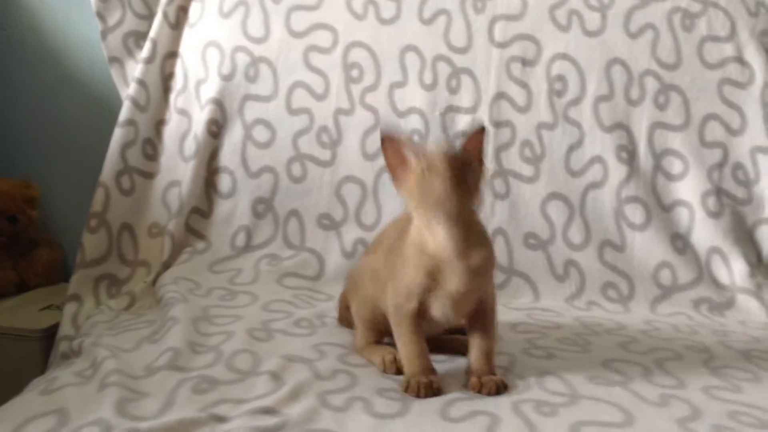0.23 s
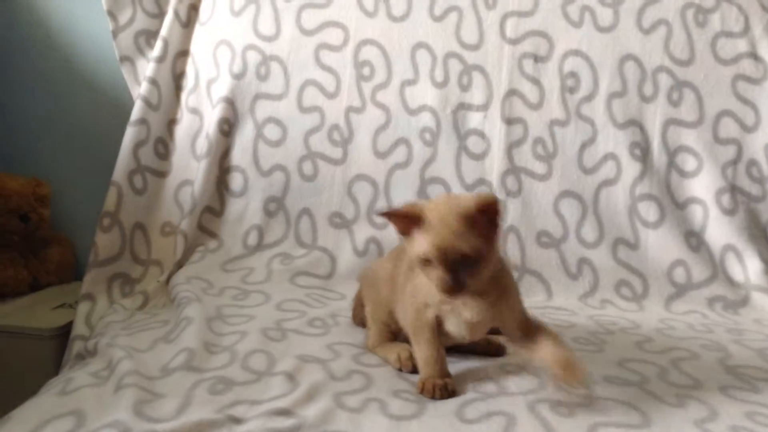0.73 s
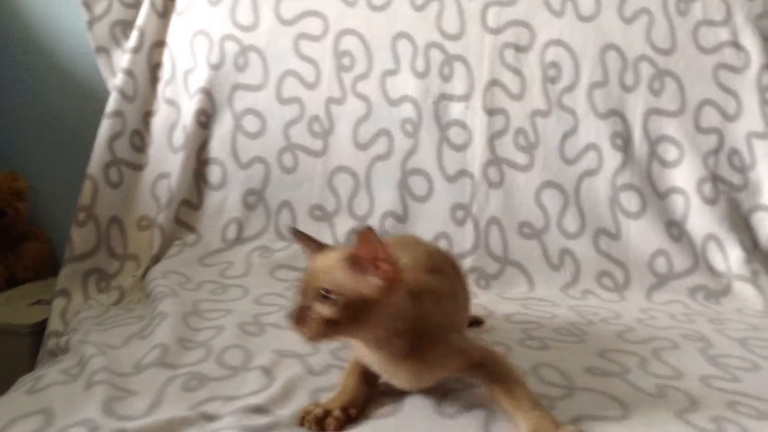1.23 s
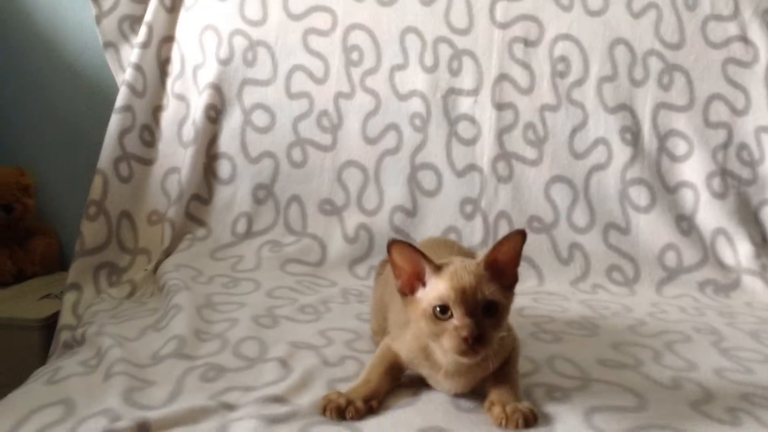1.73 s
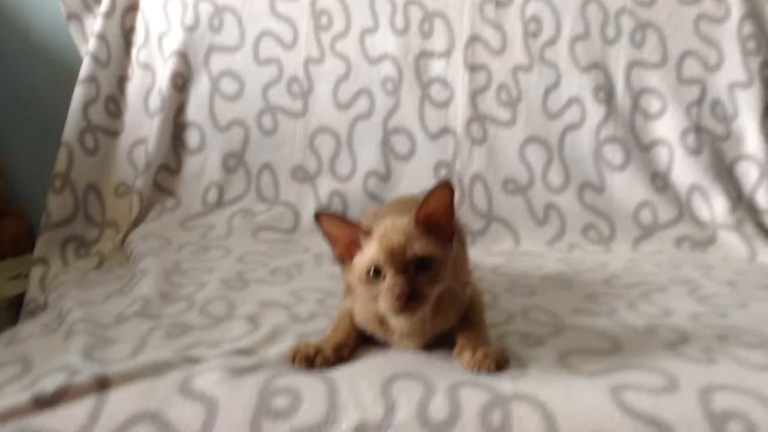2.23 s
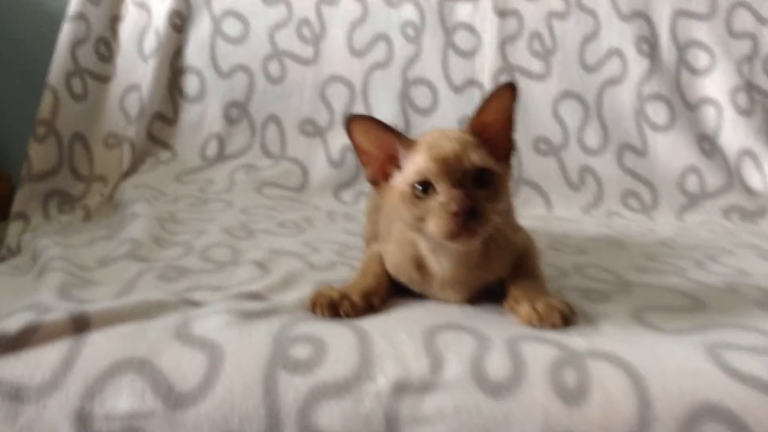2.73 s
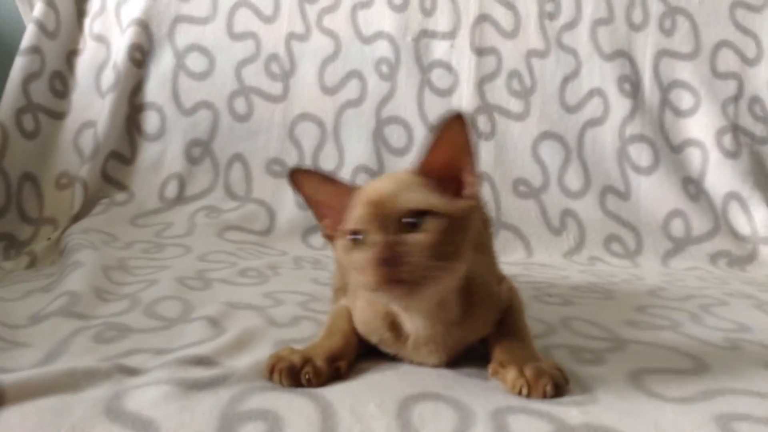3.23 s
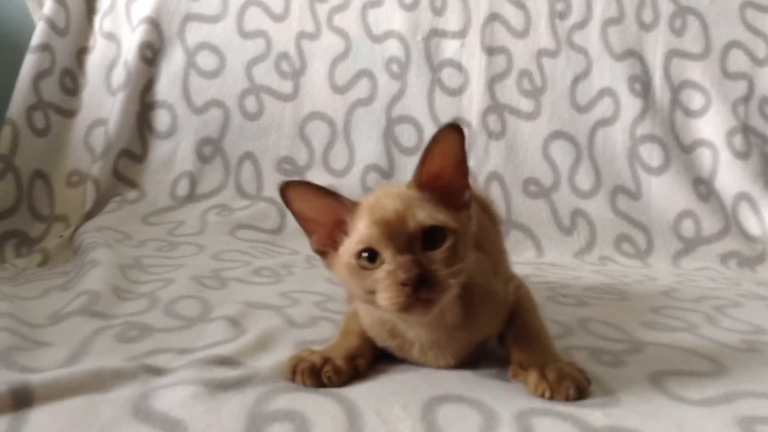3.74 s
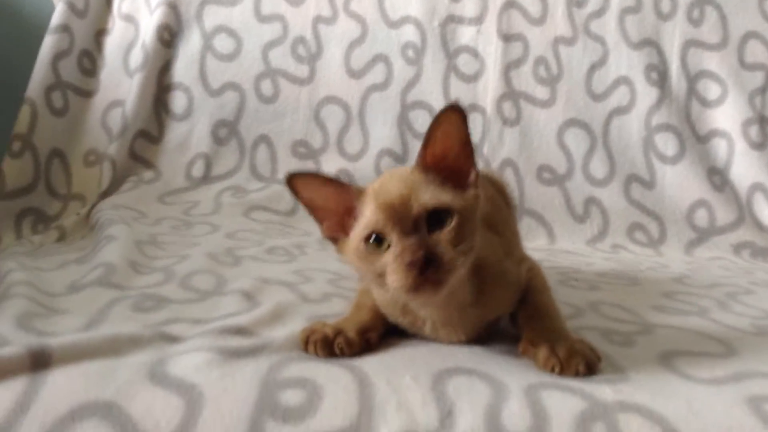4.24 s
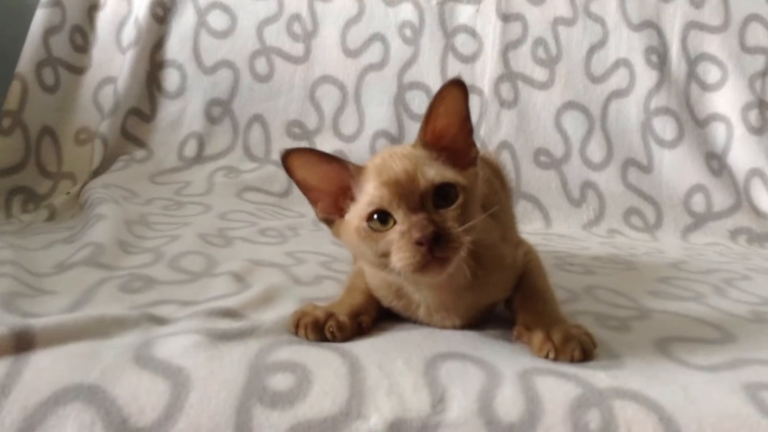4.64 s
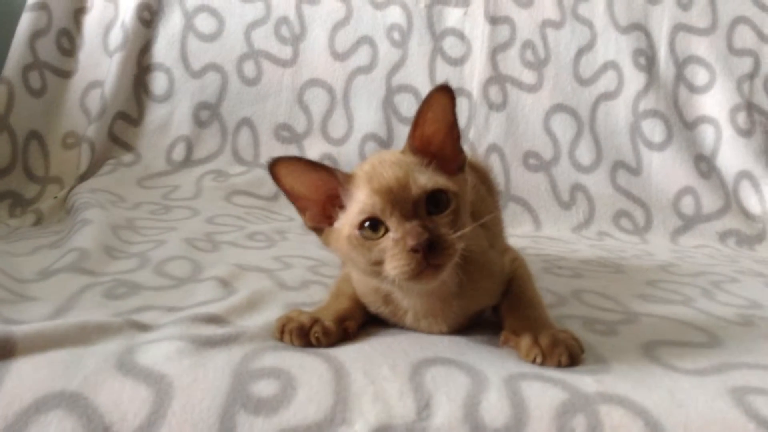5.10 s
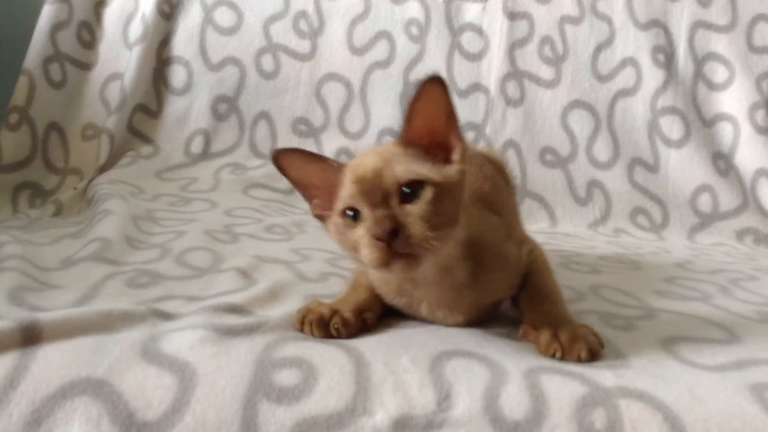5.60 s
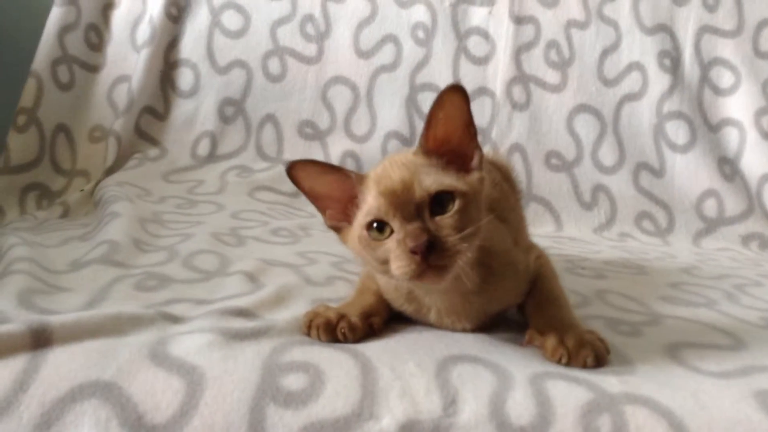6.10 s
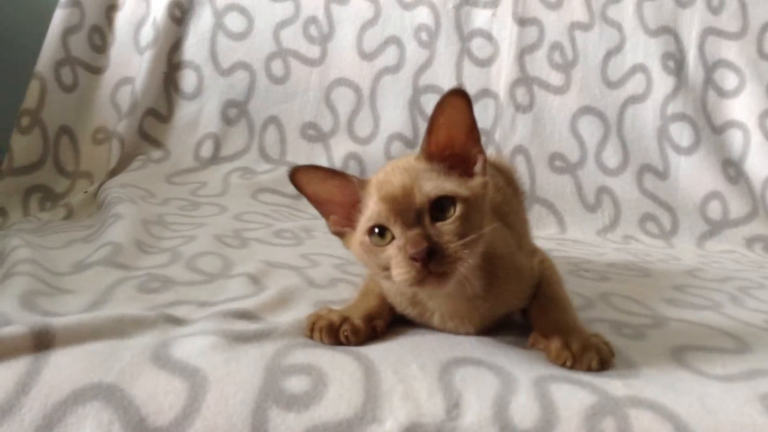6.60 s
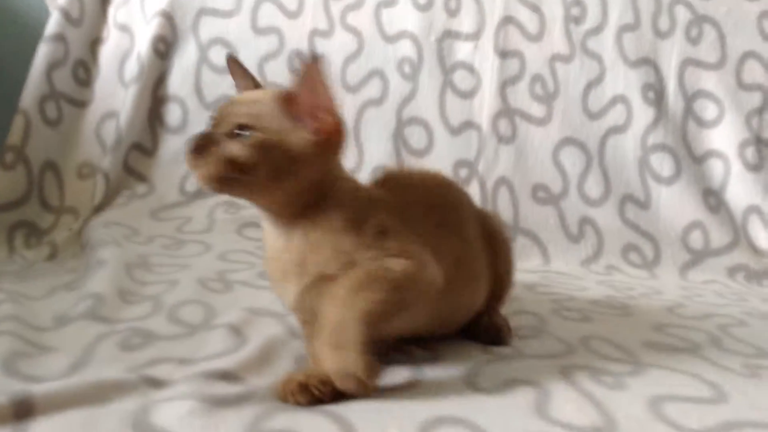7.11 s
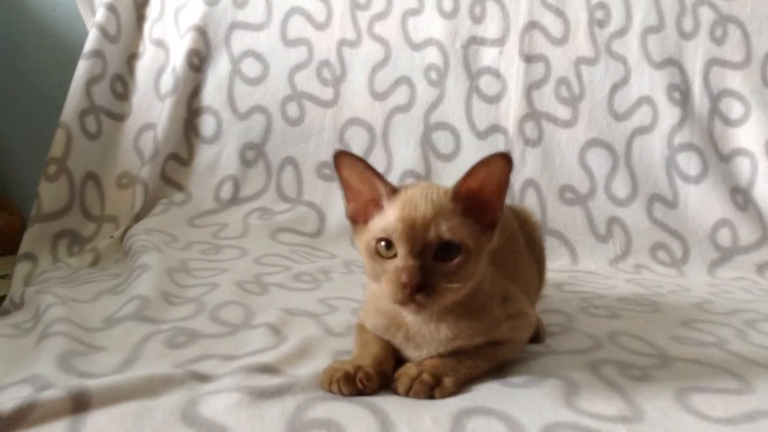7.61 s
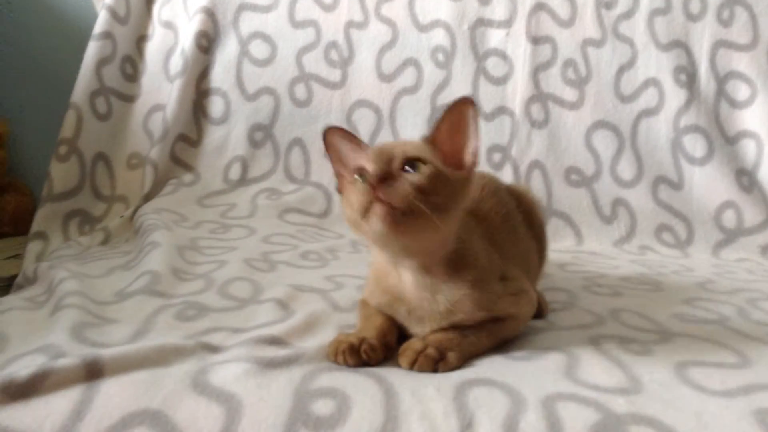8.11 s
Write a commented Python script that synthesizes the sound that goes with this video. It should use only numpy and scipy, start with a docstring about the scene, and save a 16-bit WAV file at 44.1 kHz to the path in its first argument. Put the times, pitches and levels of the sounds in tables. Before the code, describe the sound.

Dry, intimate fabric sounds: fur brushing cloth, paws scuffing the weave, claws catching in tiny sharp snaps, and dull cushion thumps. The strongest brushing swish comes under a second in; the densest scratching and thumping follows around the middle, then a few muffled knocks, then quiet rustling. Behind it all, soft hiss and a distant low engine hum gradually gaining speed, heard on a small, bass-thin microphone.

```python
"""A kitten plays on a cloth-covered sofa in a quiet room, close to the microphone.
From the start fur and paws brush the cloth: shaped slip noise, one envelope per stroke.
A far engine drones through the walls, slowly gaining speed: harmonics over rumble, above steady hiss.
Soft thumps ring the cushion in damped modes; claws and threads tick as short resonant snaps."""
import sys
import numpy as np
from scipy import signal
from scipy.fft import rfft, irfft, next_fast_len
from scipy.io import wavfile
from scipy.ndimage import uniform_filter1d, map_coordinates

SR = 44100
rng = np.random.default_rng(int(sys.argv[2]) if len(sys.argv) > 2 else 0)


def inscribe(sig):
    """Save sig as 16-bit PCM at rate SR to the path in sys.argv[1].

    A 1-D sig is mono; a 2-D sig holds one channel per row.
    Samples are clipped to [-1, 1] before scaling.
    """
    pcm = np.round(np.clip(np.atleast_2d(sig).T, -1, 1) * 32767)
    wavfile.write(sys.argv[1], SR, pcm.astype(np.int16))


N = 368219


def amp(db):
    """Gain of a level in dB."""
    return 10 ** (np.asarray(db) / 20)


def unit(x):
    """x at rms 1."""
    return x / np.sqrt(np.mean(x ** 2) + 1e-20)


def along(points, hz):
    """Interpolate (hz, value) points on a log frequency axis."""
    f, v = np.transpose(points)
    return np.interp(np.log(hz + 1), np.log(f + 1), v)


def curves(rows):
    """One per-sample curve for each column after the time."""
    s, *cols = np.transpose(sorted(map(tuple, rows)))
    return [np.interp(np.arange(N) / SR, s, c) for c in cols]


def wobble(knots_per_s):
    """A smooth random curve through normal knots."""
    knots = rng.standard_normal(int(N * knots_per_s / SR) + 4)
    return map_coordinates(knots, [np.arange(N) * knots_per_s / SR])


def filtered(x, response):
    """x times a response of frequency."""
    m = next_fast_len(len(x) + 8192)
    return irfft(rfft(x, m) * response(np.fft.rfftfreq(m, 1 / SR)), m)[:len(x)]


def peak(f, hz, width_hz):
    """A causal resonance of top gain 1."""
    return 1j * f * width_hz / (hz * hz - f * f + 1j * f * width_hz)


def fibres(spike_db, clump_db, patchy_db, snaps_per_s, snap_db):
    """Many fibres slipping: noise with uneven slip sizes, in clumps, some hard snaps, patches of colour."""
    slips = rng.standard_normal(N) * amp(spike_db * wobble(900) + clump_db * wobble(180))
    snap_here = rng.random(N) < snaps_per_s / SR
    slips += snap_here * amp(snap_db) * np.clip(rng.standard_normal(N), -1.6, 1.6)
    z = signal.stft(slips, nperseg=256)[2]
    field = uniform_filter1d(rng.standard_normal(z.shape), size=4, axis=0)  # across frequency
    field = uniform_filter1d(field, size=10, axis=1)  # across time
    return signal.istft(z * amp(patchy_db * unit(field)), nperseg=256)[1][:N]


def stroke_power():
    """Powers of brushing, scuffing, pressing: strokes land, swell and fall over stirring that rises and sinks."""
    # fur shifting between strokes: time_s, brushing_db
    stir = [(0, -53.5), (.42, -56.5), (.5, -61), (.97, -59.5), (1.45, -62), (1.87, -59.5), (2.5, -60.5),
            (2.6, -70), (3.05, -75), (3.3, -56), (3.7, -66), (4.7, -58.5), (5.0, -73.5), (5.3, -65.5),
            (5.75, -69), (6.4, -71.5), (6.65, -75), (6.75, -62), (7.3, -66), (7.78, -74), (8.0, -59.5),
            (8.35, -59.5)]
    # strokes on the cloth: start_s, swell_s, fall_s (time scale; 0 or less: at once),
    # brushing_db, scuffing_db, pressing_db (nominal peaks)
    strokes = [(0.0, 0.0027, 0.06, -71, -77, -53), (.15, 0.06, 0.07, -50, -60, -66),
               (.25, 0.028, -2.5, -54, -76, -80), (.08, .01, .08, -51.5, -61, -69),
               (0.308, 0.0025, 0.15, -64, -55.5, -58), (.347, 0.0027, 0.24, -59, -58.5, -65),
               (.34, 0.056, 0.03, -49.5, -64, -80), (0.572, 0.0036, 0.13, -48, -64, -65),
               (.616, 0.019, .3, -50, -60.5, -74), (.69, 0.064, -1, -51, -64, -69),
               (0.77, 0.0034, 0.04, -31, -41.5, -56), (0.777, 0.011, 0.09, -31.5, -44, -47.5),
               (1.003, 0.058, 0.08, -37.5, -49, -52.5), (1.089, 0.036, 0.36, -39, -51.5, -61),
               (1.155, .003, 0.11, -44, -58, -68), (1.31, 0.019, 0.37, -51.5, -61.5, -83.5),
               (1.395, 0.0033, 0.02, -46.5, -70, -81), (1.47, .023, 0.34, -78, -59, -64),
               (1.95, 0.055, 0.28, -50, -59.5, -65.5), (2.04, 0.044, 0.33, -54, -64, -65),
               (2.088, 0.021, .1, -42, -59, -61.5), (2.158, 0.043, 0.18, -49, -55.5, -57.5),
               (2.19, .004, 0, -62, -55, -51), (2.251, .003, 0.17, -61, -75, -53.5),
               (2.323, 0.0043, 0.06, -58, -62, -55), (2.345, 0.0072, 0.35, -54.5, -59, -60),
               (2.556, 0.0016, 0.1, -58, -56.5, -55.5), (2.654, 0.0018, 0.27, -68, -64.5, -66.5),
               (2.79, 0.052, 0, -62.5, -70, -80), (2.956, .002, 0.06, -60, -56.5, -62.5),
               (3.087, 0.0024, -0.1, -59, -78, -52), (3.126, 0.06, 0.1, -60, -54, -53),
               (3.19, 0.061, 0.1, -52, -66, -85), (3.306, 0.036, 0.14, -37.5, -47, -53),
               (3.41, 0.079, 0.17, -44, -57, -62), (3.544, 0.03, 0.25, -42.5, -48.5, -52.5),
               (3.58, 0.071, 0.07, -55, -46.5, -50), (3.705, .01, 0.05, -68, -70, -52),
               (3.725, 0.01, .04, -60, -50, -50.5), (3.81, .003, 0.16, -58, -56.5, -58),
               (3.836, .003, 0.06, -53, -59, -51.5), (3.865, 0.066, 0.1, -49.5, -46, -49),
               (4.09, 0.011, 0.09, -48, -48.5, -48), (4.034, 0.036, 0.0652, -40.5, -37, -41),
               (4.14, 0.027, 0.38, -47, -56, -59), (4.184, 0.035, 0, -43, -46, -48),
               (4.224, 0.014, 0.07, -47, -52, -40), (4.276, 0.0022, .07, -48, -49, -61),
               (4.37, .03, 0.4, -56, -68, -66), (4.415, 0.025, 0.07, -44, -40.5, -51),
               (4.487, 0.0016, 0.0953, -44, -44, -46.5), (4.523, 0.034, .06, -42.5, -38, -42.5),
               (4.671, 0.0017, 0.07, -70, -78, -47), (4.779, 0.0025, 0.0461, -49, -39.5, -45.5),
               (4.785, 0.042, 0.0871, -37.5, -35.5, -50), (4.819, 0.019, 0.13, -54, -53, -46),
               (4.93, 0.006, 0.4, -66, -74, -63), (5.27, 0.07, 0.6, -55.5, -62.5, -75),
               (5.39, 0.052, 0.15, -44.5, -57.5, -66), (5.66, 0.022, .15, -61, -70, -75),
               (5.776, 0.0019, 0.1, -75, -63, -49.5), (5.88, 0.0018, 0.1, -57, -53, -62),
               (5.915, 0.0088, 0.23, -66.5, -73, -64.5), (6.039, 0.0018, 0.08, -49.5, -62, -44),
               (6.06, 0.012, 0.32, -59, -65, -71), (6.094, 0.00087, .015, -39, -66, -74),
               (6.19, 0.023, .03, -64, -73, -51.5), (6.231, .002, 0.04, -52, -53.5, -43.5),
               (6.13, 0.0058, 0.16, -59, -69, -59), (6.68, .03, 0.5, -63.5, -72, -89),
               (6.79, 0.037, 0.32, -49.5, -62.5, -71), (6.93, 0.035, 0.21, -46.5, -57.5, -65.5),
               (7.1, 0.058, 0.2, -55.5, -65.5, -83), (7.37, 0.05, 0.7, -66, -72, -78),
               (7.5, 0.008, 0.24, -60.5, -79, -84), (7.93, 0.037, 0.6, -62, -65.5, -79),
               (8.1, 0.093, -0.05, -51, -63.5, -74), (8.264, 0.0023, 0.7, -53.5, -75, -85),
               (8.3, 0.04, .05, -61, -59.5, -69.5)]
    # rate of fall: brushing, scuffing, pressing [x 20 dB at fall_s]
    fall_speeds = [1.26, 1.146, 1.3]
    touch_db, swell_db_per_s = 7, 64  # start under the peak; a longer swell starts lower
    build_s, build_share = 0.0018, 0.092  # landing time constant, plus this share of the swell
    hold_share, fall_bend = 0.19, 0.84  # hold as a share of the swell; bend under 1: the fall slows down
    stir_scuff_db, stir_press_db = -10.5, -18.5  # under the brushing

    stir_db, = curves(stir)
    power = amp(2 * (stir_db + np.c_[[0, stir_scuff_db, stir_press_db]]))
    for start_s, swell_s, fall_s, *peaks_db in strokes:
        first = round(max(start_s, 0) * SR)
        swell_s, fall_s = max(swell_s, 1 / SR), max(fall_s, 1 / SR)
        t = np.arange(min(N - first, SR)) / SR
        rising_db = (touch_db + swell_db_per_s * swell_s) * np.clip(1 - t / swell_s, 0, 1)
        since_hold_s = np.maximum(t - swell_s * (1 + hold_share), 0)
        falling_db = 20 * np.c_[fall_speeds] * (since_hold_s / fall_s) ** fall_bend
        landing = 1 - np.exp(-t / (build_s + build_share * swell_s))
        power[:, first:first + len(t)] += amp(2 * (np.c_[peaks_db] - rising_db - falling_db)) * landing ** 2
    return power


def cloth():
    """Fur hisses finely; coarse slips under a paw sound through the weave, its taut threads and the padding."""
    # fur on cloth: freq_hz, gain_db
    brush_curve = [(300, -46), (1000, -40), (2500, -19), (5000, -2.5), (8000, -1), (12000, -0.5),
                   (16000, -1)]
    # weave under a paw: freq_hz, gain_db
    scuff_curve = [(500, -32), (1200, -5.5), (2200, 0), (4000, 0), (7000, -4), (15000, -23)]
    # padding under the cloth: freq_hz, gain_db
    pad_curve = [(70, -57), (150, 8), (300, 7.5), (600, 3), (1100, 0), (1800, -9), (4000, -33)]
    # hollows under the padding: freq_hz, width_hz, lift_db
    hollows = [(790, 900, 5.5), (1090, 220, 1.5)]
    # taut threads that sing under a scuff: start_s, end_s, freq_hz, width_hz, gain_db (on the band added)
    rings = [(0.3, 0.362, 2780, 500, 3), (2.345, 2.395, 2170, 400, 8), (3.14, 3.24, 3400, 700, 6),
             (3.53, 3.66, 3270, 500, 2.5), (3.9, 3.987, 3820, 500, -7), (4.047, 4.102, 1170, 200, 10),
             (4.398, 4.444, 2470, 150, 6.5), (4.52, 4.58, 2440, 150, 2), (4.79, 4.863, 2500, 127, 5),
             (4.8, 4.86, 4060, 300, -1.5), (5.768, 5.822, 2430, 696, 12), (6.244, 6.308, 1540, 395, 26)]

    def hollow(f):
        return 1 + sum((amp(db) - 1) * np.abs(peak(f, hz, w)) ** 2 for hz, w, db in hollows)

    fine = fibres(spike_db=1.5, clump_db=1.3, patchy_db=1.5, snaps_per_s=200., snap_db=18.0)
    coarse = fibres(spike_db=1.0, clump_db=1.5, patchy_db=2.0, snaps_per_s=320., snap_db=14.5)
    brush = unit(filtered(fine + 0.065 * coarse, lambda f: amp(along(brush_curve, f))))
    scuff = unit(filtered(coarse, lambda f: amp(along(scuff_curve, f))))
    press = unit(filtered(coarse, lambda f: amp(along(pad_curve, f)) * hollow(f)))
    for start_s, end_s, hz, width_hz, db in rings:
        span = slice(round(start_s * SR), round(end_s * SR))
        sung = filtered(scuff[span], lambda f: peak(f, hz, width_hz))
        scuff[span] += amp(db) * signal.windows.tukey(len(sung), .4) * sung
    return np.sum(np.sqrt(stroke_power()) * [brush, scuff, press], axis=0)


def engine():
    """Unsteady harmonics of the firing rate, lifted near wall modes, over a broad rumble with one room mode."""
    # far engine: time_s, firing_hz, third_harmonic_db, others_db (used relative to its maximum)
    course = [(0, 54.77, -84, -50), (.7, 55.13, -76, -67), (1.4, 56.2, -63.5, -66),
              (2.55, 57.3, -63, -57.5), (2.75, 57.5, -56.5, -69), (3.3, 59.8, -59, -58),
              (4, 61.2, -56.5, -61), (4.6, 62, -61, -64), (5.2, 63.44, -67.5, -86), (5.8, 62.8, -61, -73),
              (6.5, 63.55, -69, -79.5), (7.2, 64.4, -72.5, -94), (7.6, 64, -59.5, -85),
              (8.35, 65.2, -61.5, -88)]
    # other harmonics: multiple of the firing rate
    harmonics = [2, 4, 5, 6]
    # each other harmonic, then the rumble: level_db (at the others' maximum), share of the fading followed
    fades = [(-70, 0.2), (-60.5, 0.77), (-70, 1.07), (-76, 0.47), (-60.5, 0.16)]
    # wall modes that lift a passing harmonic: freq_hz, width_hz, lift_db
    wall_modes = [(112.4, 6.2, 6), (341.7, 7.8, 12.5)]
    # rumble: freq_hz, gain_db
    rumble_curve = [(30, -30), (60, 2.5), (85, -18), (130, -5), (200, 2.5), (300, -4), (450, -11.5),
                    (800, -17), (1400, -58)]
    flutter_db, phase_wobble_rad = 2.2, 0.65

    def lift_db(f):
        return sum(db * np.abs(peak(f, mode_hz, w)) ** 2 for mode_hz, w, db in wall_modes)

    def room(f):
        return amp(along(rumble_curve, f)) * (1 + 0.94 * np.abs(peak(f, 171.0, 45)) ** 2)

    hz, third_db, others_db = curves(course)
    fading_db = others_db - others_db.max()
    *tones_db, rumble_db = [db + share * fading_db for db, share in fades]
    turn = 2 * np.pi * np.cumsum(hz) / SR
    tones = 0
    for k, db in zip([3] + harmonics, [third_db] + tones_db):
        level = amp(db + lift_db(k * hz) + flutter_db * wobble(12))
        tones = tones + level * np.sin(k * turn + phase_wobble_rad * wobble(10.))
    rumble = unit(filtered(rng.standard_normal(N), room))
    return np.sqrt(2) * tones + amp(rumble_db + 2.5 * wobble(5.3)) * rumble  # tone levels are rms


def hiss():
    """The steady noise floor of room and microphone."""
    # room and microphone: freq_hz, gain_db
    floor_curve = [(200, 7), (400, -21), (800, -10), (2000, -10.5), (6000, -12), (15000, -15)]
    level_db = -67.5
    return amp(level_db) * unit(filtered(rng.standard_normal(N), lambda f: amp(along(floor_curve, f))))


def thumps():
    """A blow is one quick push; the cushion then rings with a few damped modes and a dull puff."""
    # soft blows on the cushion: start_s, level_db, pitch_hz, t60_s
    blows = [(0.006, -46, 328, 0.1), (0.787, -55, 528, 0.063), (1.015, -51, 239.5, 0.3),
             (2.252, -42.5, 208, 0.12), (2.33, -42, 146.4, 0.15), (4.046, -45.5, 284, 0.18),
             (4.184, -32.5, 277, 0.039), (4.241, -27.5, 285.6, 0.11), (4.558, -39, 271, 0.12),
             (4.676, -41, 243, 0.051), (5.776, -50.5, 158, 0.17), (6.04, -41, 350, 0.04),
             (6.061, -41.5, 139, 0.12), (6.205, -39, 168, 0.031), (6.289, -34, 238, 0.083),
             (6.31, -34, 158, 0.16), (6.385, -46.5, 217, 0.14), (6.96, -49, 268, 0.07)]
    # cushion modes: multiple of pitch_hz, level_db
    modes = [(.56, -4.5), (1, 2), (1.25, -10), (2.02, -13.5)]
    out, t = np.zeros(N + SR), np.arange(SR // 3) / SR
    for start_s, db, hz, t60_s in blows:
        push = 0.81 * amp(-60 * t / 0.013) * np.sin(2 * np.pi * 1.09 * hz * t)
        fade = amp(-60 * t / np.clip(t60_s, .02, .4)) * (1 - np.exp(-t / 0.0015))
        body = 0
        for ratio, level_db in modes:
            mode_hz = ratio * rng.normal(hz, 0.0086 * hz)
            body = body + amp(level_db) * np.sin(2 * np.pi * mode_hz * t)
        puff = unit(filtered(rng.standard_normal(len(t)), lambda f: peak(f, 530, 640) ** 2))
        blow = push + fade * (body + 0.075 * puff)
        blow = filtered(blow, lambda f: (1j * f / (85 + 1j * f)) ** 3)  # a small cushion radiates no deep bass
        out[round(start_s * SR):][:len(t)] += amp(db) * blow / np.abs(blow).max()
    return out[:N]


def ticks():
    """A catch lets go in a sharp snap of a few cycles; behind it a weaker rustle dies ever more slowly."""
    # claws and threads that catch and let go: start_s, snap_peak_db, centre_hz
    catches = [(0.209, -30.5, 9220), (0.313, -37, 2640), (0.336, -47, 2660), (.35, -33, 3480),
               (.446, -35, 7310), (.38, -35, 5500), (.57, -30, 5000), (.773, -26, 4500), (.794, -24, 9000),
               (1.009, -32, 6000), (1.042, -30, 4560), (1.156, -26, 6500), (1.393, -29, 11200),
               (1.486, -41.5, 1550), (1.521, -56, 2660), (1.539, -46, 2290), (1.592, -37, 8000),
               (1.67, -40.5, 10600), (2.19, -33.5, 1500), (2.167, -39, 1810), (2.323, -34, 2000),
               (2.557, -33.5, 2140), (2.659, -38.5, 3400), (2.855, -48.5, 2500), (2.957, -37.5, 2180),
               (3.085, -38, 3400), (3.16, -34.5, 3200), (3.174, -33, 3500), (3.304, -32, 5660),
               (3.343, -20, 8900), (3.482, -39, 5100), (3.491, -35, 7160), (3.543, -17.5, 9000),
               (3.734, -33, 1720), (3.811, -31, 2150), (3.837, -29.5, 3320), (3.872, -42, 3000),
               (4.043, -30, 2500), (4.067, -24, 1200), (4.148, -32, 3900), (4.19, -33, 902),
               (4.221, -32, 8940), (4.243, -32.5, 1500), (4.277, -29.5, 865), (4.36, -32.5, 10960),
               (4.487, -29.5, 1640), (4.523, -25, 2120), (4.537, -23.5, 1280), (4.545, -20, 6100),
               (4.672, -33.5, 1280), (4.78, -21.5, 6360), (4.934, -38, 3400), (5.066, -48, 4150),
               (5.242, -50, 2770), (5.33, -31.5, 5960), (5.409, -44, 1040), (5.416, -31, 9000),
               (5.425, -38, 8020), (5.435, -31, 9000), (5.439, -25, 9580), (5.455, -26, 6940),
               (5.515, -33.5, 7000), (5.68, -46, 6000), (5.776, -34, 1070), (5.881, -32, 2650),
               (6.039, -35.5, 1110), (6.046, -31, 1890), (6.074, -42, 2320), (6.094, -21, 12100),
               (6.137, -43, 1080), (6.203, -38.5, 1640), (6.232, -25, 1740), (6.692, -46, 6000),
               (7.056, -31, 8550), (7.068, -41, 8000), (7.134, -34.5, 7000), (7.147, -36, 7000),
               (7.224, -45, 6000), (7.385, -40, 7330), (7.412, -44, 6000), (7.504, -48, 7000),
               (7.637, -43.5, 6000), (7.874, -42, 10000), (8.017, -38, 6000), (8.198, -38, 6000),
               (8.266, -34, 9000), (8.286, -36, 7030)]
    tail_db, tail_db_per_octave, tail_t60_s = -13.5, -3, 0.14  # level at 3 kHz; weaker behind higher catches
    out, t = np.zeros(N + SR), np.arange(SR // 4) / SR
    for start_s, db, hz in catches:
        def snap_response(f):
            low = peak(f, hz, .5 * hz) + .5 * peak(f, 2.0 * hz, 0.92 * hz)
            return low + 0.18 * hz / 5400.0 * peak(f, 4700, 12000)

        snap = 0.43 * amp(-60 * t / (12.0 / hz)) * rng.standard_normal(len(t))  # 60 dB in 12 cycles
        snap[0] = 4.6  # the release itself
        snap = filtered(snap, snap_response)
        octaves = np.log2(hz / 3e3)
        tail = unit(filtered(rng.standard_normal(len(t)), lambda f: peak(f, hz, 0.77 * hz) ** 2))
        tail *= amp(tail_db + tail_db_per_octave * octaves - 60 * (t / tail_t60_s) ** 0.61)
        out[round(start_s * SR):][:len(t)] += amp(db) * (snap / np.abs(snap).max() + tail)
    return out[:N]


def scene():
    """All sources at one microphone."""
    return (cloth() + engine() + hiss() + thumps() + ticks())[None]


def record(dry):
    """The small microphone loses the deep bass; nothing passes above the band limit."""
    top_hz = 15350
    thin = filtered(dry[0], lambda f: (1j * f / (90 + 1j * f)) ** 3)
    return filtered(thin, lambda f: f < top_hz)[None]


dry = scene()
out = record(dry)
inscribe(out)
```